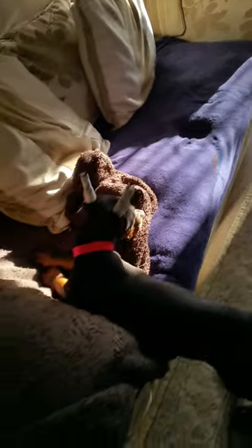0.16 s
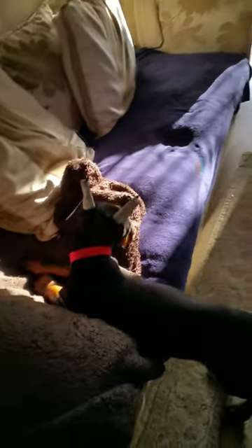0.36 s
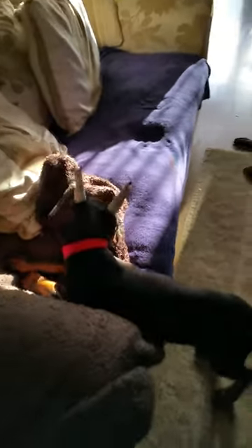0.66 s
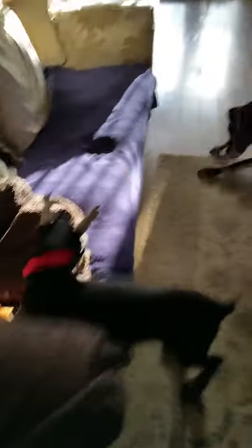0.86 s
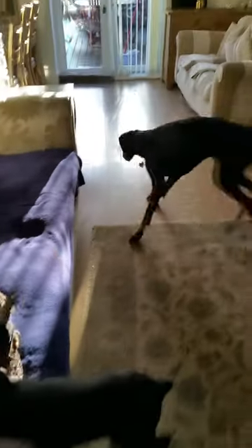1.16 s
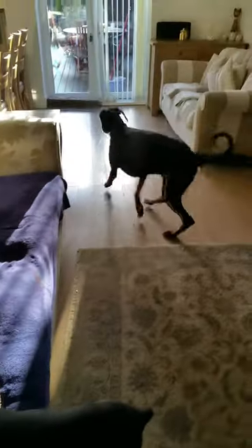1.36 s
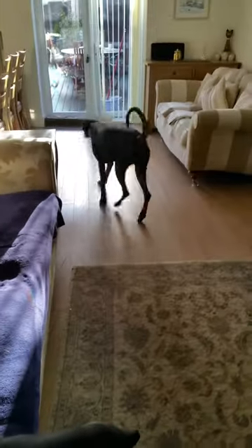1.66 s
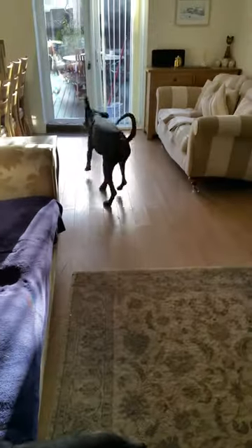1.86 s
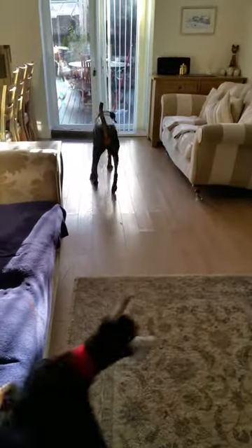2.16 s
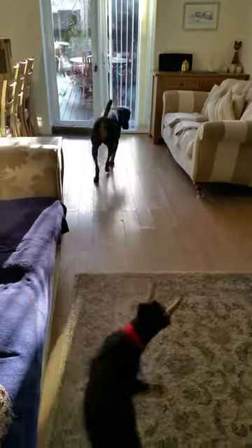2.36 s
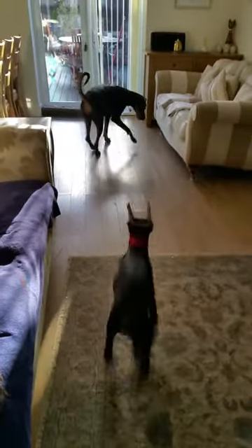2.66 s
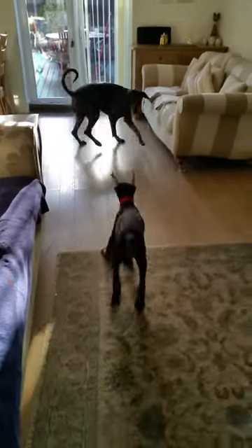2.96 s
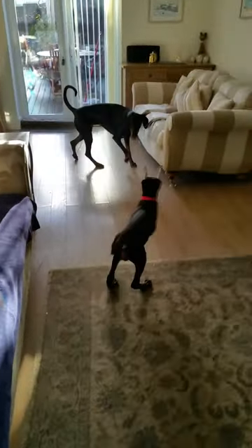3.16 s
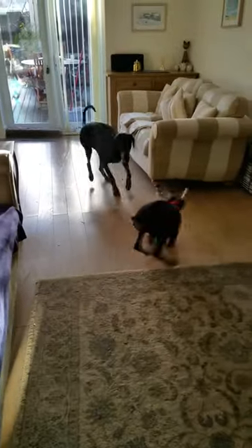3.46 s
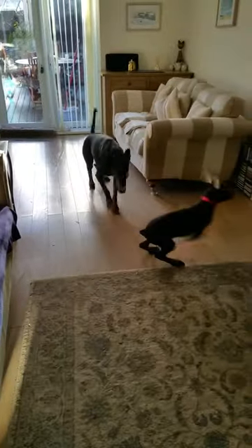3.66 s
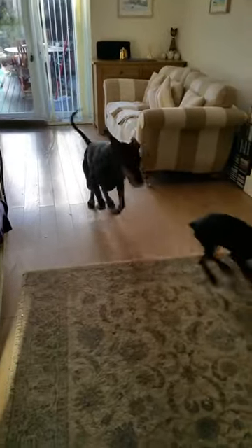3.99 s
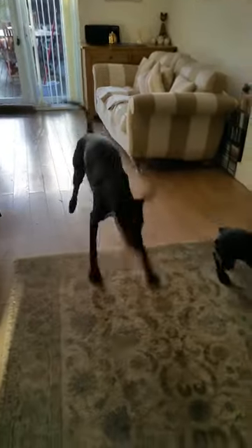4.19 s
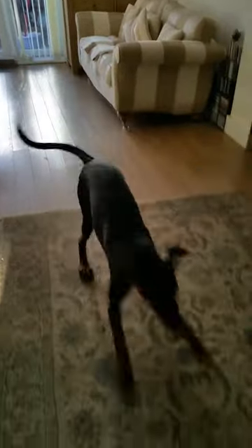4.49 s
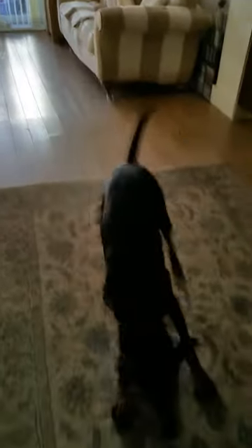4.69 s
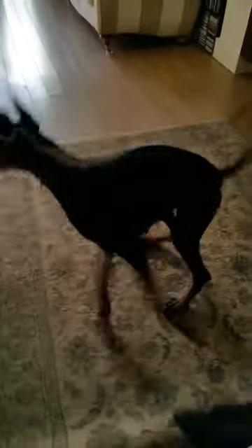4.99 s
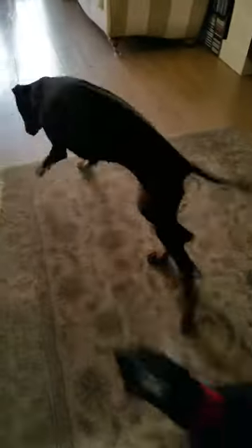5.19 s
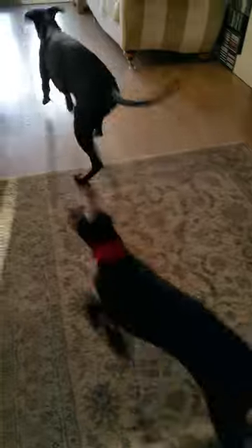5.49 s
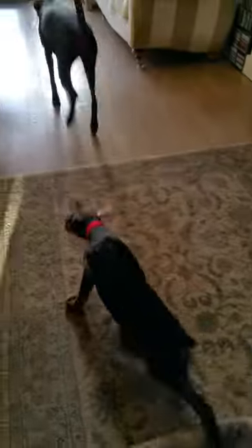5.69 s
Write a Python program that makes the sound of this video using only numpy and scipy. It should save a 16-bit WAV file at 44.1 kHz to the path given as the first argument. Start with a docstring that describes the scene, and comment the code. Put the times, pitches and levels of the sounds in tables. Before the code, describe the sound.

Two dogs play on a hard floor and rug, picked up by a small stereo device nearby. Soft thuds and dragging open the scene, followed by near-quiet with light claw clicks and one clear metallic tag clink. Later, running paws pound the boards, claws skid and snap, and feet rub the rug to the end. No barking or whining.

```python
"""In a living room, two dogs romp on a laminate floor and a rug, heard through a two-port microphone.
Paws excite decaying board modes, claws are filtered impulses with a noisy skid, and collar tags are
beating metal modes. Dragging feet are grainy filtered noise, over the floor's murmur and rumble; a faint
creak is resonant friction noise. Noise tails let the room answer each paw, claw and tag contact;
a wavering sine is an appliance's hum, and filtered noise is the quiet air."""
import sys
import numpy as np
from scipy import signal
from scipy.fft import rfft, irfft, next_fast_len
from scipy.io import wavfile
from scipy.ndimage import map_coordinates

SR = 44100
rng = np.random.default_rng(int(sys.argv[2]) if len(sys.argv) > 2 else 0)


def transcribe(u):
    """Save the signal u as a 16-bit wav file named by the first command-line argument.

    u: samples, shape (n,) or (channels, n), limited to [-1, 1]; the rate is SR.
    q: integer samples, one column per channel.
    """
    v = np.clip(np.atleast_2d(u).T, -1, 1)
    q = np.round(v * 32767).astype(np.int16)
    wavfile.write(sys.argv[1], SR, q)


N = 257532


def amp(db):
    """Decibel law: the amplitude gain of a level."""
    return 10 ** (np.asarray(db) / 20)


def unit(x):
    """Normalization: x scaled to rms 1."""
    return x / np.sqrt(np.mean(x ** 2) + 1e-20)


def along(points, hz):
    """Logarithmic interpolation: the value at hz between (frequency, value) points."""
    point_hz, values = np.transpose(points)
    return np.interp(np.log(hz + 1), np.log(point_hz + 1), values)


def smooth_random(positions, count):
    """Band-limited randomness: a smooth curve through count random knots, read at knot positions."""
    return map_coordinates(rng.standard_normal(count), [positions])


def wobble(knots_per_s):
    """Slow fluctuation: a smooth random curve as long as the scene."""
    return smooth_random(np.arange(N) * knots_per_s / SR, int(N * knots_per_s / SR) + 4)


def filtered(x, response):
    """Linear filtering: the spectrum of x times a response of frequency."""
    size = next_fast_len(x.shape[-1] + 8192)
    spectrum = rfft(x, size) * response(np.fft.rfftfreq(size, 1 / SR))
    return irfft(spectrum, size)[..., :x.shape[-1]]


def noise(spectrum):
    """Coloured noise: two unrelated signals of rms 1 with a given spectrum."""
    return unit(filtered(rng.standard_normal((2, N)), lambda hz: amp(along(spectrum, hz))))


# Likeness of the two ports in a diffuse field: pitch_hz, correlation (-1 to 1)
LIKENESS = [(40, .985), (150, .94), (300, .68), (600, .35), (1200, -.1), (3000, .05), (12000, -.05)]


def diffuse(pair):
    """Diffuse-field coherence: two unrelated signals become left and right, alike chiefly in the bass."""
    def mid_side_gains(hz):
        angle = np.arccos(np.clip(along(LIKENESS, hz), -1, 1)) / 2
        return np.sqrt(2) * np.array([np.cos(angle), np.sin(angle)])

    mid, side = filtered(pair, mid_side_gains)
    return np.array([mid + side, mid - side]) / np.sqrt(2)


def add(track, start_s, sound):
    """Superposition: mixes a sound into a track at start_s."""
    part = track[:, round(start_s * SR):][:, :sound.shape[1]]
    part += sound[:, :part.shape[1]]


# Reverberation time of the room: pitch_hz, t60_s
ROOM_DECAY = [(80, 0.55), (250, 0.36), (700, 0.39), (2000, 0.4), (5000, 0.37), (13000, 0.23)]
TAIL_SAMPLES = 26000
PORT_LAG = .00002  # a source to one side is louder and earlier at that port, s per dB


def room_tail(gap_s):
    """Reverberation: two noises whose every frequency dies at its own speed."""
    hz, _, cells = signal.stft(rng.standard_normal((2, TAIL_SAMPLES)), SR, nperseg=256)
    t = np.arange(TAIL_SAMPLES) / SR
    # 256-sample frames advance by half a frame
    frame_s = np.arange(cells.shape[-1]) * 128 / SR
    decay = amp(-60 * frame_s / along(ROOM_DECAY, hz)[:, None])
    tail = signal.istft(cells * decay, SR, nperseg=256)[1][:, :TAIL_SAMPLES]
    tail = tail * (1 - np.exp(-(t / gap_s) ** 2))  # walls need a moment to answer
    return tail / np.linalg.norm(tail[0])


def strike(near, far, start_s, direct, radiated, pan_db, room_db, gap_s):
    """Direct and reverberant field: places a sound between the ports, with a fresh answer of the room."""
    lag_s = pan_db * PORT_LAG
    sides = np.array([[1], [-1]])
    pair = filtered(direct, lambda hz: np.exp(1j * np.pi * hz * lag_s * sides))
    add(near, start_s, pair * amp(sides * pan_db / 2))
    answer = signal.fftconvolve(radiated[None], room_tail(gap_s), axes=1)
    add(far, start_s, amp(room_db) * answer)


# Appliance hum: pitch_hz, relative level_db
HUM_TONE = (98.8, -63)
# Spectrum of the room air: pitch_hz, relative level_db per Hz
AIR_SPECTRUM = [(20, -8.5), (60, -14.5), (130, -12.5), (400, -7), (700, 1), (1300, -16.5), (3000, -18.5),
                (5600, -10.5), (6500, -14.5), (9000, -19), (16000, -21)]


def quiet():
    """Stationary background: diffuse air noise and a nearly steady sinusoidal hum."""
    hz, level_db = HUM_TONE
    hum_gain = amp(level_db + 7.0 + 0.62 * wobble(6.6))
    hum = hum_gain * np.sin(2 * np.pi * hz * np.arange(N) / SR + 0.12 * wobble(1.6))
    return hum + amp(-66.0 + 0.64 * wobble(14)) * diffuse(noise(AIR_SPECTRUM))


# A faint creak: start_s, length_s, level_db
CREAK_EVENT = (0.05, 0.078, -44.5)
# Resonances of what creaks: pitch_hz, width_hz, relative level_db
CREAK_MODES = [(603, 28, 5), (867, 27.5, -2), (1060, 15, -2), (1290, 37, -0.5), (1850, 39, -19)]


def creak():
    """Resonant friction: noise swells and fades through a few narrow resonances."""
    start_s, length_s, level_db = CREAK_EVENT
    progress = np.clip((np.arange(N) / SR - start_s) / length_s, 0, 1)
    swell = np.sin(np.pi * progress) ** 0.6

    def resonances(f):
        return sum(amp(mode_db) / (1 + 1j * (f - hz) / width_hz) for hz, width_hz, mode_db in CREAK_MODES)

    friction = unit(filtered(rng.standard_normal((2, N)), resonances))
    return amp(level_db) * swell * diffuse(friction)


SHAKE_GROWS = 0.64  # dB of shaking per dB of landing
SHAKE_RISE_S, SHAKE_FALL_S = 0.045, 0.059  # time constants


def shaking():
    """Energy summation: every paw landing adds a swell of floor shaking that rises and dies."""
    t = np.arange(N) / SR
    energy = np.zeros(N)
    for start_s, level_db, *_ in PAW_LANDINGS:
        since = np.maximum(t - start_s, 0)
        swell = (1 - np.exp(-since / SHAKE_RISE_S)) * np.exp(-since / SHAKE_FALL_S)
        energy += (amp(SHAKE_GROWS * level_db) * swell) ** 2
    return np.sqrt(energy)


# Feet dragging over rug and boards, levels joined by straight lines:
# start_s, rub level_db, scrape over rub level_db
DRAG_LEVELS = [(0.0, -71.5, -12.5), (0.109, -56, -4), (0.259, -41.5, 1.5), (0.63, -69, -18.5),
               (0.92, -59, -5), (0.99, -49.5, -4), (1.35, -64.5, 1.5), (1.82, -47.5, -6),
               (2.13, -58.5, -0.5), (2.63, -67, 5), (2.82, -52, -5), (3.11, -71.5, 1), (3.29, -62.5, -8),
               (3.345, -48, -14), (3.43, -44, -1), (3.58, -47, -5), (3.77, -37.5, -6.5), (3.99, -46.5, -3),
               (4.18, -53.5, -9), (4.28, -46, -3.5), (4.59, -56.5, -4), (4.94, -43.5, -7),
               (5.05, -45.5, -3), (5.298, -34.5, -2.5), (5.45, -50, -7.5), (5.61, -52.5, -2),
               (5.84, -52, 2.5)]
# Spectra of claws scraping, pads rubbing, boards murmuring, joists rumbling:
# pitch_hz, relative level_db per Hz
SCRAPE_SPECTRUM = [(1200, -37.5), (2400, 2), (3200, 0), (5200, -4), (7400, -14), (11000, -13),
                   (16000, -23.5)]
RUB_SPECTRUM = [(350, -31), (700, 1), (1100, 0.5), (1600, -4.5), (2200, -5), (3500, -30.5), (8000, -81)]
MURMUR_SPECTRUM = [(50, -58), (110, -11), (200, -2), (280, -6), (370, -1), (550, -10), (900, -13.5),
                   (2000, -86)]
JOIST_SPECTRUM = [(15, -28), (30, -13.5), (55, 2.5), (80, -9.5), (110, -32), (200, -94.5)]
MURMUR_OVER_RUB_DB = 3.5
MURMUR_DB, RUMBLE_DB, RUMBLE_REST_DB = -25, -38, -73  # boards and joists per unit shake; joists at rest


def dragging():
    """Friction and structure-borne noise: claws scrape, pads rub, boards murmur and joists shake."""
    start_s, rub_db, scrape_db = np.transpose(DRAG_LEVELS)
    t = np.arange(N) / SR
    rub = amp(np.interp(t, start_s, rub_db))
    scrape = amp(np.interp(t, start_s, rub_db + scrape_db))
    shake = shaking()
    grain = amp(0.52 * wobble(250) + 0.95 * wobble(21))
    hiss = scrape * unit(grain * noise(SCRAPE_SPECTRUM)) + rub * unit(grain * noise(RUB_SPECTRUM))
    # moving feet and landings add in energy
    murmur_gain = np.hypot(amp(MURMUR_OVER_RUB_DB) * rub, amp(MURMUR_DB) * shake)
    murmur = murmur_gain * unit(amp(4.64 * wobble(25)) * noise(MURMUR_SPECTRUM))
    rumble_gain = (amp(RUMBLE_REST_DB) + amp(RUMBLE_DB) * shake) * amp(2.5 * wobble(2))
    return diffuse(hiss + murmur + rumble_gain * noise(JOIST_SPECTRUM))


# Tag clinks, relative level of each family of modes:
# start_s, high level_db, low level_db, top level_db, middle level_db
TAG_CLINKS = [(1.523, -58.5, -60, -80, -73), (1.618, -57, -56.5, -45.5, -50.5), (1.775, -47, -70, -70, -70),
              (1.869, -29.5, -22, -25.5, -37), (3.515, -58, -80, -78, -80), (3.572, -60, -97, -75, -81),
              (3.642, -51, -72, -80, -80), (4.032, -56, -82, -80, -80), (4.242, -41.5, -77, -66, -57),
              (4.352, -64, -80, -56, -57), (4.429, -52.5, -75, -51, -55), (4.829, -55.5, -74, -64, -78),
              (4.865, -55.5, -88, -60, -61), (4.931, -64, -79, -66, -68), (5.294, -65, -80, -70, -72),
              (5.38, -59, -76, -66, -65), (5.478, -55, -56, -60, -58), (5.51, -50, -56, -41, -52),
              (5.568, -54, -59, -72.5, -57)]
# Modes of the tags, one list per family in the order high, low, top, middle:
# pitch_hz, relative level_db, t60_s
TAG_MODES = [
    [(10700, -7, .14), (10770, -2, .2), (10850, -4, .18), (10910, 0, .2), (10980, -3, .16), (11080, -7, .1),
     (10160, -20, .15)],
    [(4712, 0, .22), (4757, -4, .36), (3280, -22, .18), (3320, -20, .18)],
    [(13880, -1, .14), (13957, 0, .2), (14040, -6, .1), (15500, -12, .05)],
    [(8888, 0, .18), (8960, -3, .14), (9040, -4, .16), (7386, -13, .2)],
]
TAG_RISE_S, TAG_ROOM_DB = 0.0052, 2.5  # the tags settle against each other
RATTLE_DB, RATTLE_T60_S = -8.5, 0.11  # rattle relative to the loudest family
SWING = 0.00008  # swinging tags waver in phase, radians per Hz


def tags():
    """Modal excitation: where two thin metal tags touch decides which families ring; close modes beat."""
    near, far, t = np.zeros((2, N)), np.zeros((2, N)), np.arange(SR // 3) / SR

    def drift():
        return smooth_random(t * 100, 40)

    for start_s, *levels in TAG_CLINKS:
        burst = rng.standard_normal(len(t)) * amp(-60 * t / RATTLE_T60_S)
        rattle = filtered(burst, lambda hz: 1 / (1 + (7000 / (hz + 1)) ** 8))  # treble only
        sound = amp(max(levels) + RATTLE_DB) * rattle
        for family_db, family in zip(levels, TAG_MODES):
            for hz, mode_db, t60_s in family:
                flutter_db = (1.5 + hz / 4500) * drift()  # turning tags beam their modes about
                level_db = family_db + mode_db - 1 + rng.normal(0, 1.8) + flutter_db
                phase = 2 * np.pi * (hz * t + rng.random()) + SWING * hz * drift()
                sound += amp(level_db - 60 * t / t60_s) * np.sin(phase)
        sound = sound * (1 - np.exp(-t / TAG_RISE_S))
        strike(near, far, start_s, sound, sound, pan_db=-1.0, room_db=TAG_ROOM_DB, gap_s=0.006)
    return near + diffuse(far)


# Claw contacts: start_s, relative level_db, left-right level_db,
# relative knock level_db, relative treble level_db, room level_db
CLAW_CONTACTS = [(0.1554, -17.5, 6.5, -15, -21.5, 10.5), (0.4915, -54.5, 7, 3, -24, 3.5),
                 (0.8115, -65, -5, 16, -12, -1), (0.9341, -31.5, 4, -12.5, -28.5, 12),
                 (0.9445, -27.5, 4.5, -29, -36, 13), (1.1519, -15, -1, -19, -20, 6.5),
                 (1.337, -40, 5, -4, -14, 9.5), (1.4178, -30, 2.5, -31, -24, 3),
                 (1.4687, -35.5, 5.5, -9.5, -16.5, 9.5), (1.6952, -35, -1.5, -6.5, -16, 6.5),
                 (1.7842, -29.5, -19, -47, -15, 1), (1.7871, -21, 1, -31, -12.5, -2.5),
                 (1.7923, -35, -14, -8.5, -16.5, 17.5), (2.0313, -34.5, 1.5, -17, -18.5, 12.5),
                 (2.0895, -34, 0, -13.5, -22, 5), (2.2084, -50, -9, 4.5, -12.5, 9.5),
                 (2.2536, -50.5, 0.5, -2, -15, 9), (2.321, -30.5, 1, -15, -20, 6),
                 (2.5606, -35, -3, -11.5, -24.5, 10), (2.8454, -41.5, -0.5, -22, -23.5, 10),
                 (2.9496, -39, -1.5, 2.5, -23, 7), (3.0939, -32.5, 8, -10.5, -18.5, 7.5),
                 (3.1785, -47, 6.5, 0.5, -21, 12.5), (3.3735, -27, -3, -3.5, -21.5, 3.5),
                 (3.4006, -31, -13, -8, -21.5, 15), (3.4515, -20.5, 1.5, -37, -23, 0.5),
                 (3.462, -31, 1.5, -40, -22.5, 13.5), (3.5448, -34, -10, -23, -19, 9),
                 (3.6053, -23.5, -4, -24, -28, 14), (3.6131, -30.5, -1, -24, -20.5, 2.5),
                 (3.62, -23, 0.5, -34, -14, 9), (3.6254, -19.5, -1.5, -42, -18, 8.5),
                 (3.666, -14, -2.5, -22, -18, 14.5), (3.6686, -17, -4.5, -22, -27, -1),
                 (3.673, -6, -8.5, -37, -26.5, -1), (3.6847, -16, 0.5, -17, -21.5, 3.5),
                 (3.8053, -5.5, 1.5, -10, -25, 7), (3.9606, -24.5, -3.5, -22, -20, 11.5),
                 (3.9681, -24, -1.5, -20, -24, 3), (3.9848, -22, -8.5, -21, -19, 1),
                 (4.0028, -23, -4, -32, -16, -1.5), (4.0062, -16.5, 7, -36, -23.5, 1),
                 (4.1883, -32, -1.5, -7, -26, 11), (4.28, -38, 6, 0, -31, -3.5),
                 (4.397, -43.5, -4.5, 4.5, -25, 16.5), (4.4666, -42, 11.5, 5.5, -15, 7.5),
                 (4.616, -33.5, -17.5, 2.5, -24.5, 10), (4.775, -40.5, -2.5, 8.5, -20.5, 3),
                 (5.015, -29.5, 5.5, -4.5, -13.5, 1.5), (5.026, -40, 16, -10, -22.5, 0),
                 (5.4638, -39.5, 5, 2, -16, 4.5), (5.5838, -31, 5, -2, -17.5, 6),
                 (5.627, -35.5, 2, -5.5, -14, 7), (5.6534, -26.5, 3.5, -9, -26, 1.5),
                 (5.738, -26, 6.5, -21, -15.5, 11), (5.819, -27, -2, -17.5, -11.5, 2.5)]
# Spectra of a claw and of the board under it: pitch_hz, relative level_db per Hz
CLICK_SPECTRUM = [(800, -41), (2000, -11), (3000, -8.5), (4000, -5), (5000, -4), (5800, -10), (7500, -24.5),
                  (12000, -40.5)]
KNOCK_SPECTRUM = [(300, -46.5), (600, -0.5), (1000, 2), (1600, -2), (2300, -6.5), (3200, -16), (6000, -48)]
SKID_DB, WALL_GAP_S = -19.5, 0.0035  # the skid under its blow; the wait for the walls


def claws():
    """Impulse response: a very short blow, then a skid; it knocks the board, hard tips add treble."""
    near, far, t = np.zeros((2, N)), np.zeros((2, N)), np.arange(2048) / SR
    lead = 128  # samples before the blow
    since = t - lead / SR
    blow = 1. * (np.arange(len(t)) == lead)
    for start_s, level_db, pan_db, knock_db, treble_db, room_db in CLAW_CONTACTS:
        skid_decay = amp(-60 * np.abs(since) / 0.042) * (since > 0)
        skid = amp(SKID_DB) * rng.standard_normal(len(t)) * skid_decay

        def colour(hz):
            click = amp(along(CLICK_SPECTRUM, hz))
            knock = amp(knock_db + 5.5 + along(KNOCK_SPECTRUM, hz))
            tip = amp(treble_db + 1) / (1 + (6500 / (hz + 1)) ** 6)
            return amp(level_db + 21) * (click + knock + tip)

        direct, radiated = filtered(np.array([blow + skid, blow]), colour)
        strike(near, far, start_s + 0.00104 - lead / SR, direct, radiated, pan_db, room_db, WALL_GAP_S)
    return near + diffuse(far)


# Paw landings: start_s, relative level_db, board pitch_hz, relative slap level_db, room level_db
PAW_LANDINGS = [(0.153, -6.5, 380.4, -2, 0.5), (0.176, -10, 236, -1, 0.5), (0.196, -10, 200, -12, -16),
                (0.219, -13.5, 206, 1, -8.5), (0.414, -34.5, 250.3, -8, 0.5), (0.492, -41.5, 275, 3, -5),
                (0.81, -47, 284, 6, -4.5), (0.949, -42.5, 388, -5, 5.5), (1.151, -14.5, 292.4, -17, 3.5),
                (1.189, -32.5, 242, 1, 2.5), (1.343, -20, 218, -10, -6), (1.469, -28, 243, -7, 4.5),
                (1.634, -41.5, 378, 6.5, 2.5), (1.701, -39.5, 190, 3, 2.5), (1.86, -37.5, 269, -1.5, -2),
                (2.024, -36, 275, -28, 4.5), (2.208, -28, 287, -33, 7.5), (2.482, -23, 229, -14, -2.5),
                (2.515, -33, 263, -4, -7), (2.547, -26.5, 194, -15, -6), (2.774, -40, 220, -5, -13),
                (2.8, -29.5, 337, -24, 4.5), (2.879, -28.5, 216, -21, -6), (2.947, -27.5, 229, -9.5, -6.5),
                (2.967, -30.5, 155, -7, -1), (3.098, -33.5, 339, -18, 8.5), (3.181, -26, 271, -9.5, -1),
                (3.377, -15.5, 270, -7, 5.5), (3.404, -5.5, 273, -24, -1.5), (3.445, -13, 250, -38, -21),
                (3.514, -25, 312, -25, -10), (3.623, -23, 312, -6.5, 1), (3.671, -15.5, 279, -4, -0.5),
                (3.804, -16.5, 222, -4.5, -2.5), (3.829, -21, 384, -5.5, 1.5), (3.86, -13, 224, -13, -10),
                (3.884, -17.5, 226, -18, -10), (3.96, -12.5, 205, -22, -4.5), (3.997, -15, 209, -14, -18),
                (4.047, -27.5, 228, -23, -8), (4.08, -24.5, 252, -25, -3.5), (4.251, -7, 227, -8, 0.5),
                (4.282, -1.5, 248, -50, -4.5), (4.31, -9, 285, -40, -3.5), (4.325, -15, 199, -29, -18),
                (4.408, -17.5, 241, -11, -1), (4.465, -7.5, 212, -18, -6), (4.617, -7.5, 399, -6.5, -7.5),
                (4.626, -12, 402, -20, -3.5), (4.644, -14, 250, -11, -4.5), (4.669, -31, 305, -22, 1),
                (4.737, -16.5, 214, -17, -5), (4.777, -11.5, 214, -11.5, -8), (4.954, -21.5, 232, -8, -4),
                (5.014, -18, 243, -6.5, -5), (5.179, -26, 354, -13, -10), (5.2, -24.5, 194, -2.5, -4),
                (5.281, -6, 233, -16, -8), (5.32, -19.5, 160, -11, -4), (5.472, -24.5, 226, -10, -3.5),
                (5.588, -15.5, 250, -15.5, 2.5), (5.631, -16.5, 222, -8, 4), (5.653, -10.5, 236, -2.5, -4),
                (5.664, -8, 327, -11, -12), (5.7, -21.5, 246, -30, 7.5), (5.737, -25.5, 192, -6, 4.5)]
BOARD_T60_S, BOARD_T60_SPREAD = 0.053, 0.1  # median ring and its log scatter from landing to landing
BUMP_DB, BUMP_GROWS = -30, 0.68  # deep bump against a 0 dB landing; dB gained per dB of landing


def paws():
    """Damped modes: a soft pad pushes a floating board, which swells and dies, with a slap and a bump."""
    near, far, t = np.zeros((2, N)), np.zeros((2, N)), np.arange(SR // 8) / SR

    def ring(hz, t60_s, rise_s):
        return np.sin(2 * np.pi * hz * t) * amp(-60 * t / t60_s) * (1 - np.exp(-t / rise_s))

    for start_s, level_db, hz, slap_db, room_db in PAW_LANDINGS:
        spread = np.exp(0.098 * rng.standard_normal(6))  # random detuning of the modes
        board_t60_s = BOARD_T60_S * np.exp(BOARD_T60_SPREAD * rng.standard_normal())

        def board(t60_s):
            main = ring(hz, t60_s, 0.0027)
            upper = .5 * ring(1.46 * hz * spread[0], 0.95 * t60_s, 0.0061)
            lower = 0.58 * ring(0.776 * hz * spread[1], t60_s, 0.021)
            return main + upper + lower

        slap = ring(480 * spread[2], 0.015, 0.0024)
        slap += 0.31 * ring(760 * spread[3], 0.01, 0.002)
        slap += 0.18 * ring(1200 * spread[4], 0.012, 0.0028)
        bump = amp(BUMP_DB + (BUMP_GROWS - 1) * level_db) * ring(60 * spread[5], 0.075, 0.017)
        rest = amp(slap_db + 7.5) * slap + bump
        direct = amp(level_db + 5.5) * (board(board_t60_s) + rest)
        # the walls hear the whole floor, a broader thump than the one board
        radiated = amp(level_db + 9.5) * (board(0.027) + rest)
        strike(near, far, start_s + 0.0024, direct, radiated, pan_db=0.8, room_db=room_db, gap_s=0.0032)
    return near + diffuse(far)


def scene():
    """Superposition: everything that sounds in the room."""
    return quiet() + creak() + dragging() + tags() + claws() + paws()


# Difference in colour of the two ports: pitch_hz, left-right level_db
PORT_COLOUR = [(100, 1.5), (300, -0.5), (1400, 2), (3000, 1), (6000, 1), (10000, -4), (14000, -6)]
TOP_HZ = 15800  # band limit


def record(dry):
    """Transduction: ports differ in colour and lose deep bass, peaks round off, the band is limited."""
    def port_response(hz):
        colour = amp(np.outer([.5, -.5], along(PORT_COLOUR, hz)))
        return colour / (1 + (30 / (hz + 1)) ** 2)

    ports = filtered(dry, port_response)
    rounded = ports / (1 + np.abs(ports / 1.05) ** 8) ** (1 / 8)
    return filtered(rounded, lambda hz: hz < TOP_HZ)


dry = scene()
out = record(dry)
transcribe(out)
```